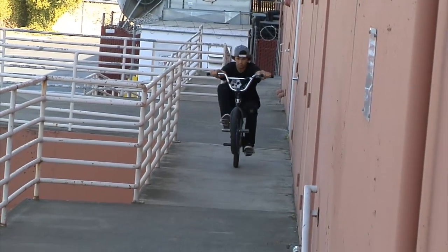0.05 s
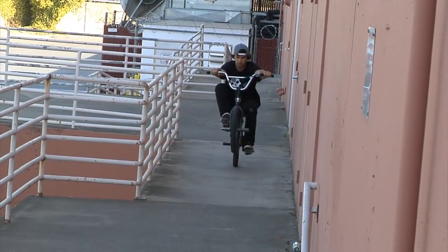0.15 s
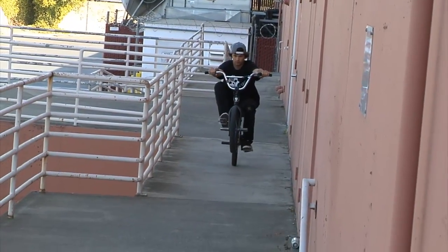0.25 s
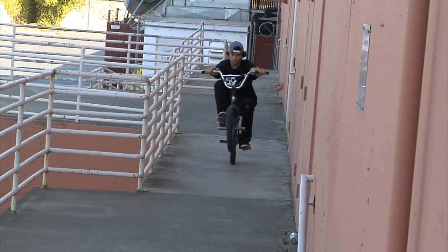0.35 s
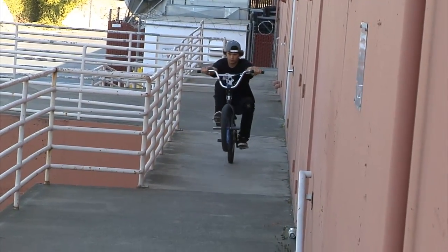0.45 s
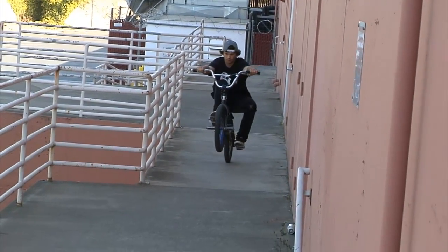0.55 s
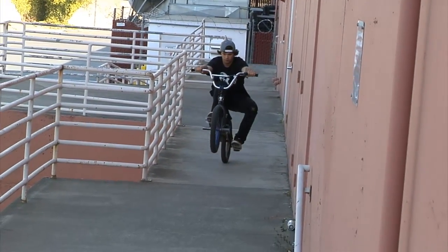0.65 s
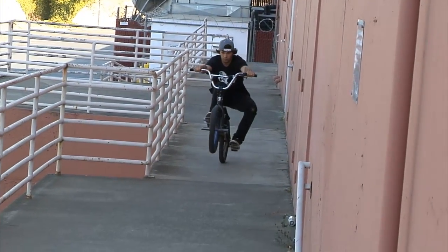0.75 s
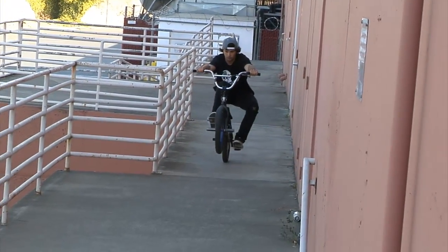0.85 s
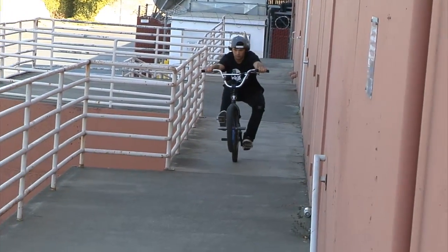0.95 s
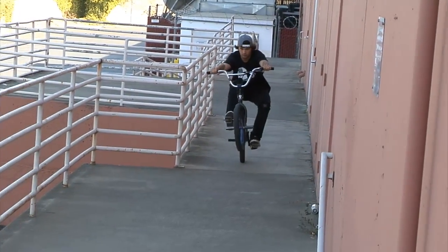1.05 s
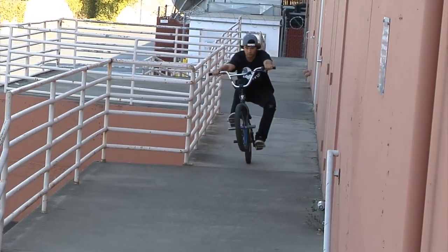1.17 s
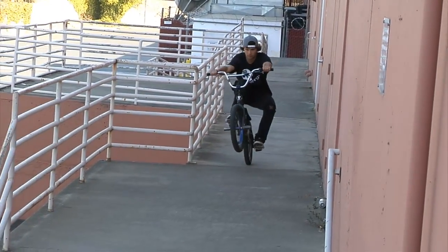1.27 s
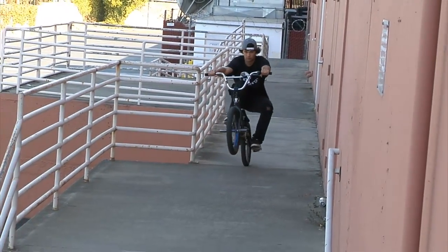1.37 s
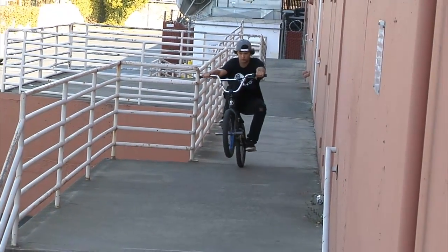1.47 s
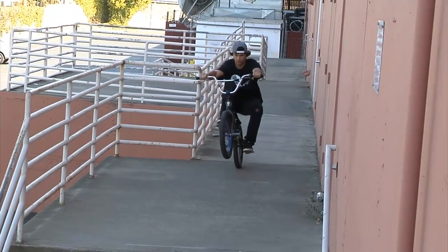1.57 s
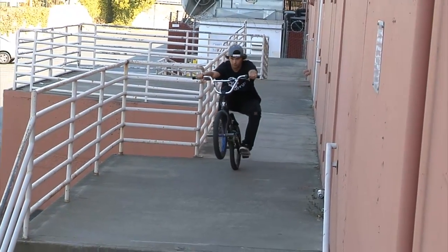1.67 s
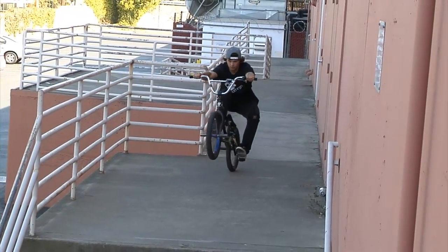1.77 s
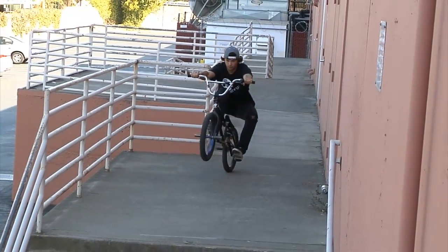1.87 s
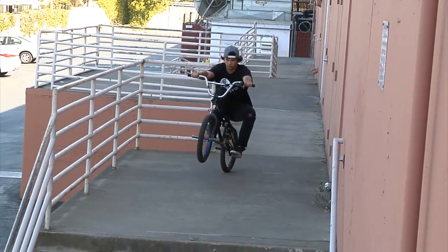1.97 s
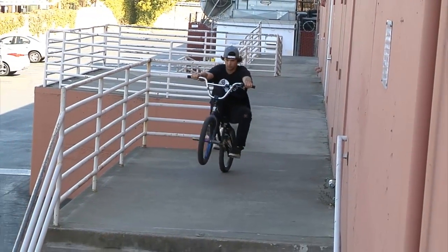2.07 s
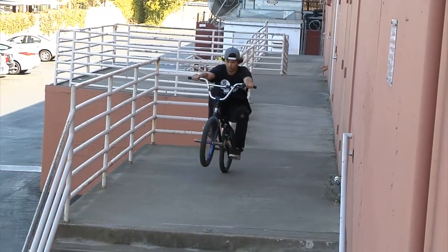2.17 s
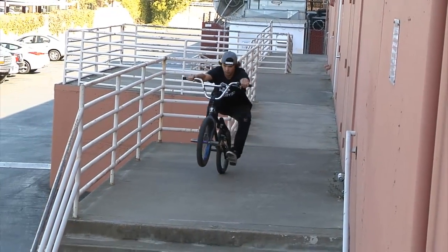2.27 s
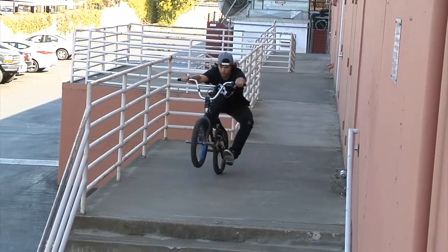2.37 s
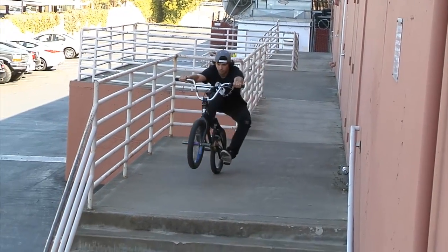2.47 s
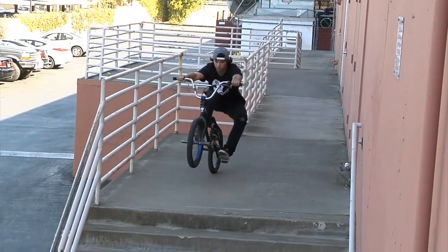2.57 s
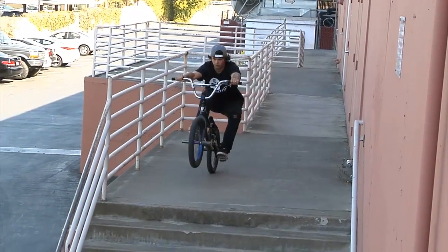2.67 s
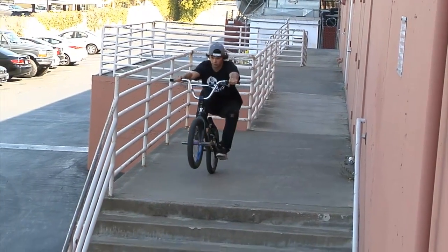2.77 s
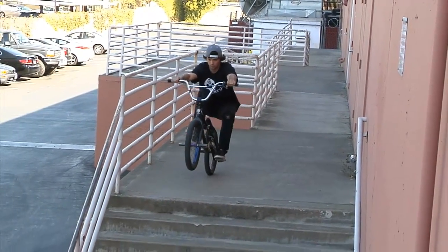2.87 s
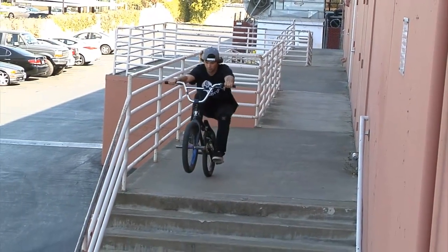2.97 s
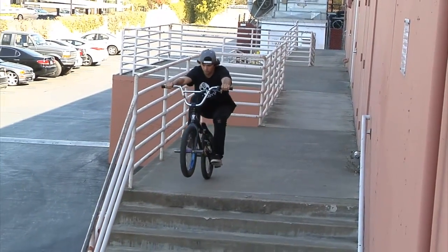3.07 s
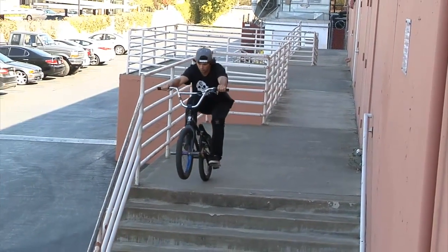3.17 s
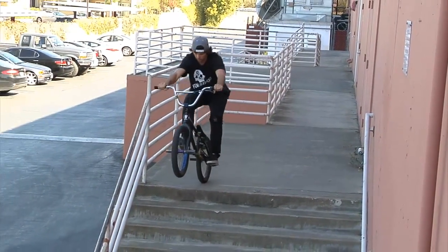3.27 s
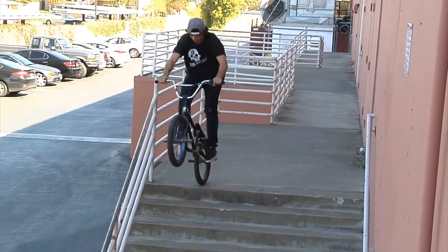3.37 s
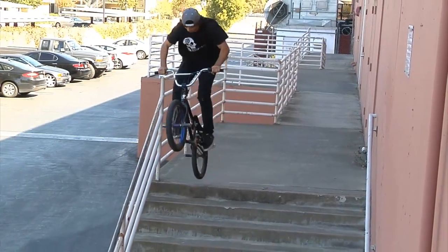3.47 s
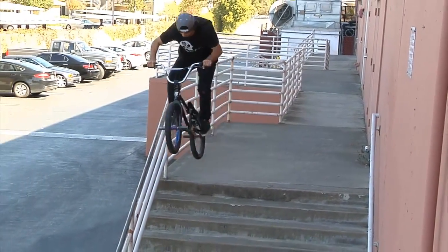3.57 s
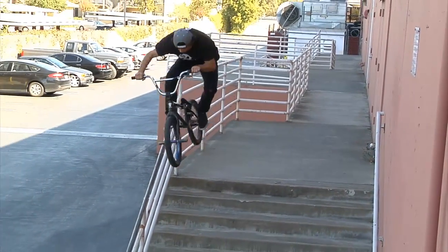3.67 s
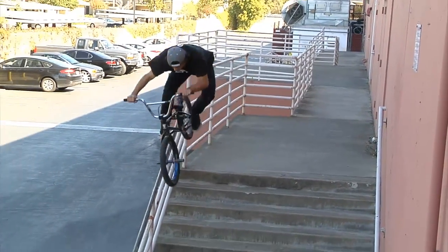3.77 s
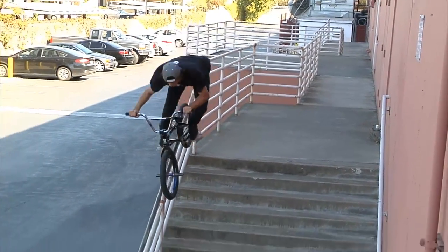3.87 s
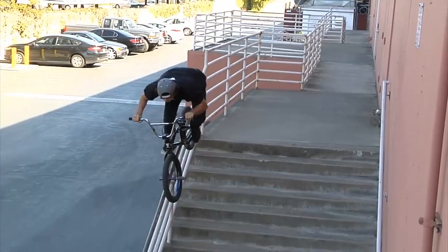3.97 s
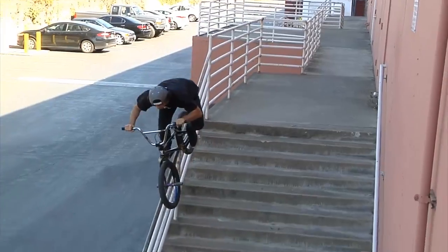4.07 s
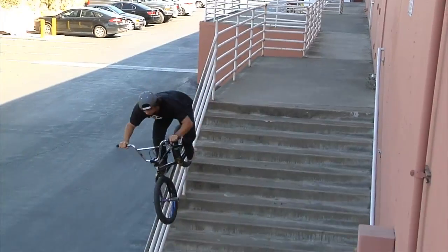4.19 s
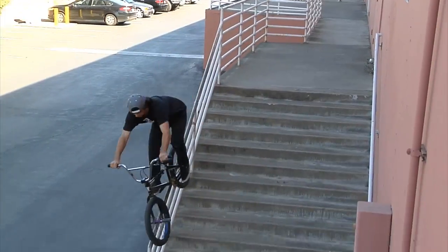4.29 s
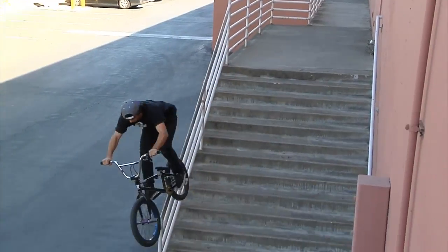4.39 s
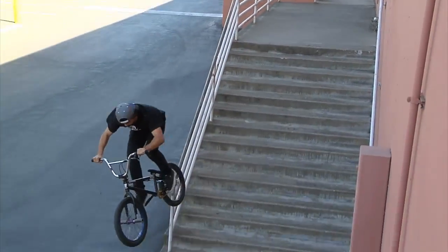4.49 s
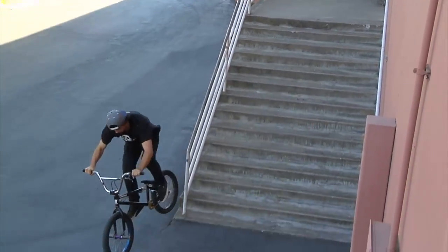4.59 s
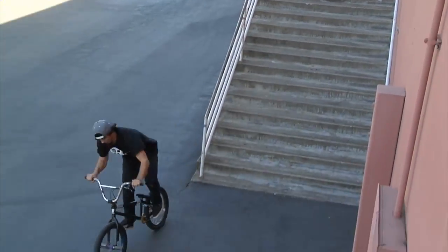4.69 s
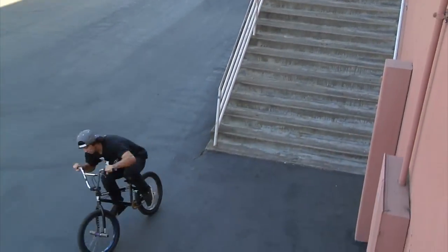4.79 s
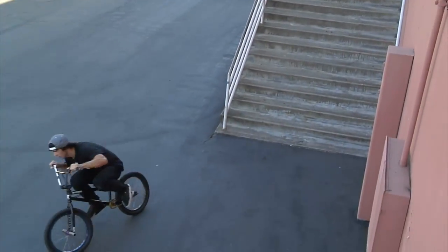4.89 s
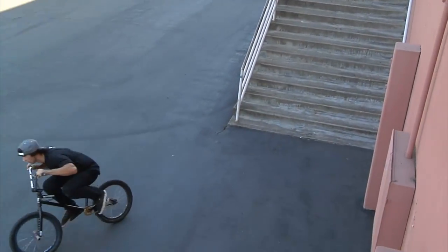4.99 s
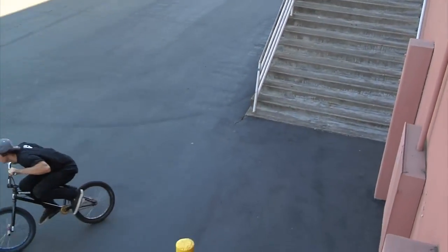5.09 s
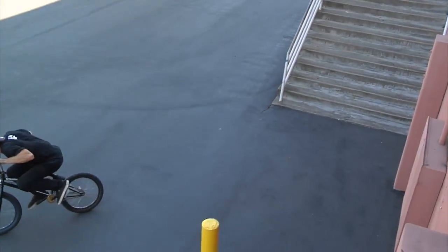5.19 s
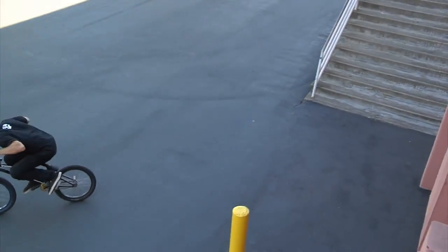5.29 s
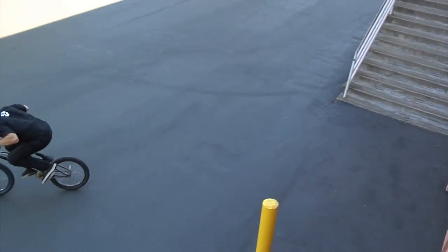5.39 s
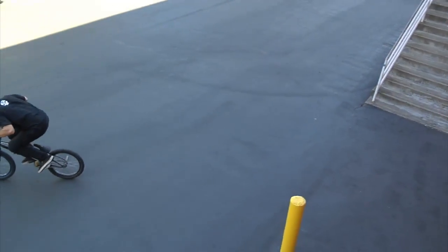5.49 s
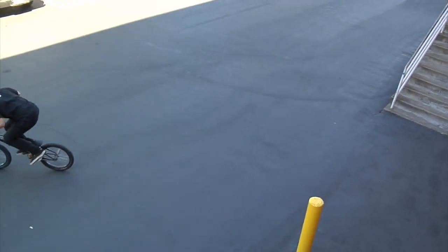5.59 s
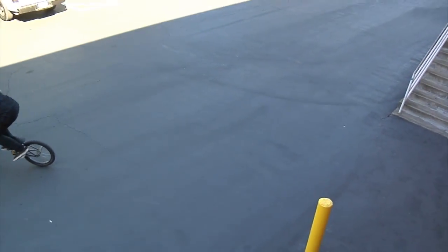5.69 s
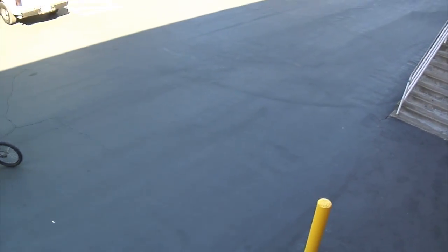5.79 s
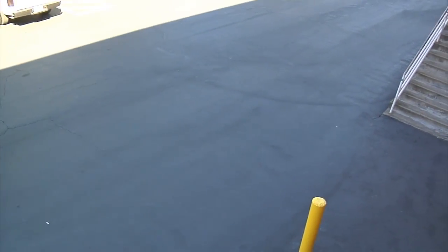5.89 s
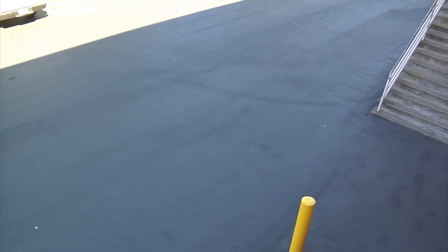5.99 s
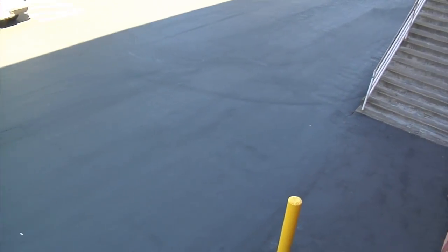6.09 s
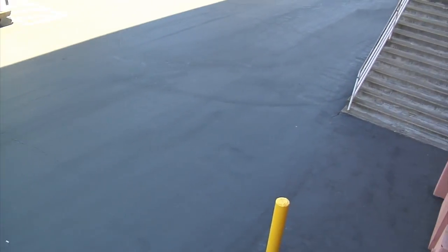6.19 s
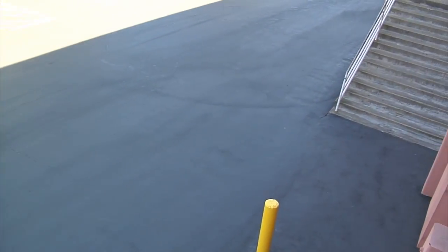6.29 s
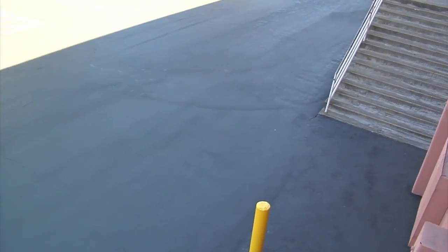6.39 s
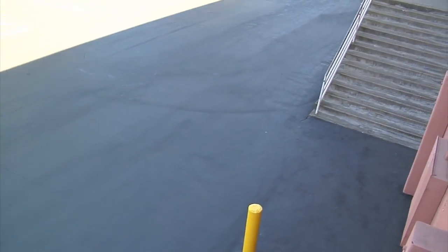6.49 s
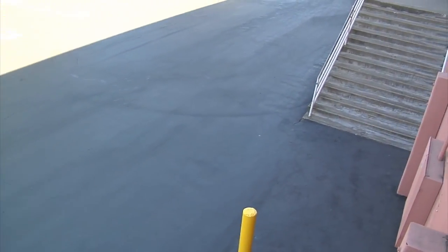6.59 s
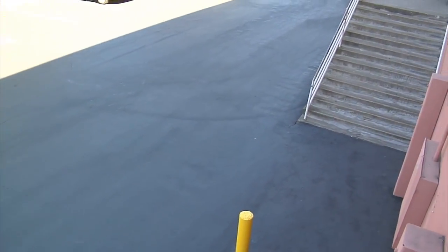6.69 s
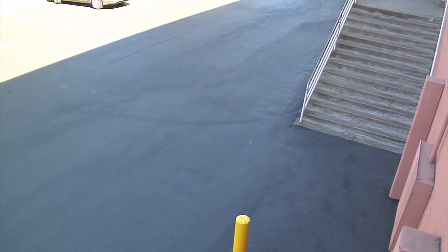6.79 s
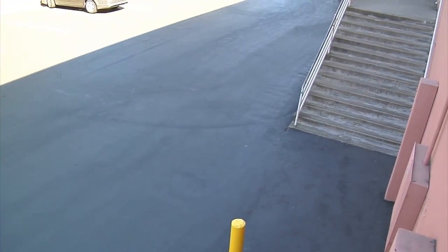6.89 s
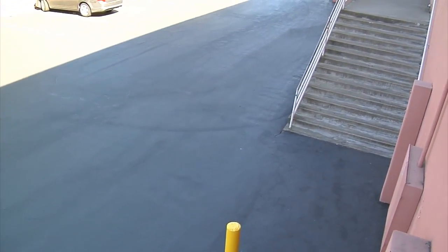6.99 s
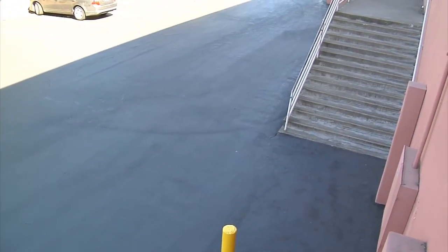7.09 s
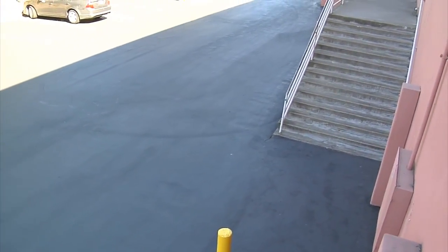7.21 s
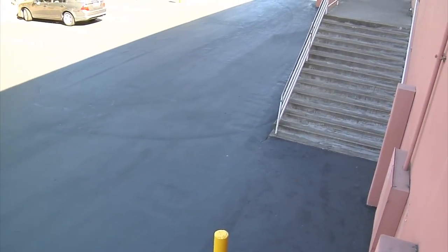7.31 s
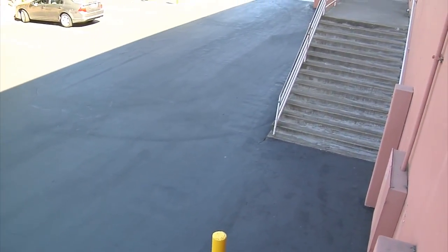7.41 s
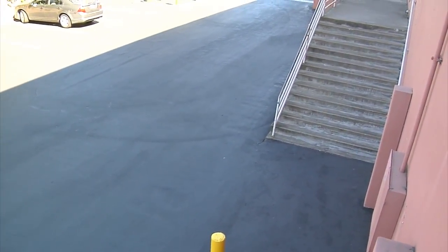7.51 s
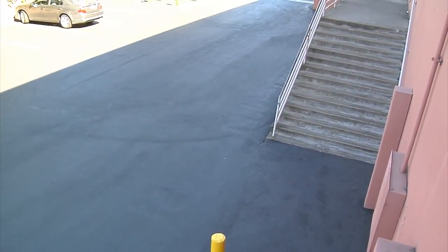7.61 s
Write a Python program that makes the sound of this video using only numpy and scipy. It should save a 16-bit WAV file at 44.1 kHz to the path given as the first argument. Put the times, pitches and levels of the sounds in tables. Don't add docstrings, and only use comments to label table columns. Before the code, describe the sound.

A coasting bike ticks faintly closer, cracks onto a steel handrail, scrapes down it, thumps onto asphalt with chain rattle, and buzzes off.

```python
import sys
import numpy as np
from scipy import signal
from scipy.fft import rfft, irfft
from scipy.io import wavfile
from scipy.ndimage import uniform_filter1d

SR = 44100
rng = np.random.default_rng(int(sys.argv[2]) if len(sys.argv) > 2 else 0)


def pcm_store(signal):
    levels = np.round(np.clip(np.atleast_2d(signal), -1, 1) * 32767)
    wavfile.write(sys.argv[1], SR, levels.astype(np.int16).T)


def ratio(d):
    e = np.asarray(d, float) / 20
    return 10 ** e


N = 337365
GRIND_STARTS_S, GRIND_ENDS_S, LANDS_S = 3.9205, 4.73, 4.745


def unit(x):
    return x / np.sqrt(np.mean(x ** 2))


def curve(table):
    s, *columns = np.transpose(table)
    return [np.interp(np.arange(N) / SR, s, c) for c in columns]


def step(s, takes):
    return .5 + .5 * np.tanh((np.arange(N) / SR - s) / takes)


def since(s):
    return np.maximum(np.arange(N) / SR - s, 0)


def decay(u, t60):
    return np.exp(-np.log(1000) * u / t60)


def add(out, s, sound):
    i = int(s * SR)
    out[i:i + len(sound)] += sound


def walk(rate):
    k = int(SR / rate)
    held = np.repeat(rng.standard_normal(N // k + 1), k)
    return uniform_filter1d(uniform_filter1d(held, k), k)[:N]


def band(x, lo_hz, hi_hz):
    return signal.sosfilt(signal.butter(4, [lo_hz, min(hi_hz, .45 * SR)], "band", fs=SR, output="sos"), x)


def ring(x, hz, width):
    r = np.exp(-np.pi * width / SR)
    gain = np.sqrt(1 - r * r)
    return signal.lfilter([gain, 0, -gain], [1, -2 * r * np.cos(2 * np.pi * hz / SR), r * r], x)


def colour(x, spectrum):
    hz, db = np.transpose(spectrum)
    bins_hz = np.arange(2049) * SR / 4096
    c = irfft(np.interp(np.log(bins_hz + 1), np.log(hz), db) * np.log(10) / 20)
    c[1:2048] *= 2
    c[2049:] = 0
    return signal.fftconvolve(x, irfft(np.exp(rfft(c))))[:len(x)]


def grind(blows):
    # (time [s], scrape level [dB], slip [0-1])
    peg_slide = [
        (3.935, -26.5, 0.65),
        (4.05, -30, 0.61),
        (4.21, -31.5, 0.16),
        (4.31, -25.5, 0.43),
        (4.39, -26, 0.86),
        (4.47, -25.5, 0.8),
        (4.52, -31, 1),
        (4.575, -30.5, 0.68),
        (4.63, -38, 0.26),
    ]
    # (frequency [Hz], density [dB per Hz])
    scrape_tone = [(90, -7.5), (210, 2.5), (330, -10), (510, -3), (1100, -13.5), (1870, -5), (2010, -9.5),
                   (3300, -13), (4200, -22.5), (5700, -36.5), (6300, -25), (8500, -32), (11000, -60),
                   (15700, -60)]
    # (level [dB], ring time t60 [s])
    rail_modes = [(-35, 2.9), (-36, 5), (-41, 0.4), (-44, 0.28), (-35.5, 1.14), (-47, 1.3), (-44.5, 0.94),
                  (-50, 0.48), (-63, 0.5), (-61, 3.5), (-52, 3), (-47, 0.56), (-43, 0.64), (-50, 0.5),
                  (-43.5, 1.56), (-45, 0.83), (-50, 0.86), (-54, 0.75), (-51, 1.9), (-55, 1.9), (-41, 1.5),
                  (-42, 0.07), (-43, 0.51), (-49, 0.5), (-46, 0.44), (-53, .3), (-41, 0.13), (-44, 0.073),
                  (-58, .3), (-51, 0.08), (-62, .3), (-51, .25), (-55, .2)]
    rail_hz = [151, 213, 301, 334, 495, 530, 590, 654, 734, 791, 829, 885, 915, 960, 1001, 1229, 1409, 1450,
               1529, 1593, 1697, 1845, 1889, 2140, 2203, 2480, 3112, 3310, 6290, 7620, 2690, 3520, 6650]
    scrape_db, slip = curve(peg_slide)
    t = since(GRIND_STARTS_S)
    touch = step(GRIND_STARTS_S, 0.0006) - step(GRIND_ENDS_S, 0.014)
    scrape_db = scrape_db + 8 * np.exp(-t / 0.0089)
    rumble_db = -21 - 17 * t - 12 * np.exp(-t / 0.0098)
    hiss_db = scrape_db - 22.5 + 15 * slip
    sizzle_db = scrape_db - 33.5 + 6.5 * slip + 1.5 * walk(60)

    grains = unit(rng.standard_normal(N) * ratio(2.0 * rng.exponential(size=N)))
    grains = grains * ratio(1.4 * walk(45) + 1.1 * walk(200))
    rough = colour(grains, scrape_tone)
    edges_hz = [90, 700, 5900, 10500, 15800]
    levels = [rumble_db, scrape_db - 0.8, hiss_db, sizzle_db]
    direct = touch * sum(unit(band(rough, lo, hi)) * ratio(db) for lo, hi, db in zip(edges_hz, edges_hz[1:], levels))

    force = touch * grains * ratio(scrape_db) + ratio(-7.5) * blows
    split = 1 + .003 * rng.uniform(.4, 1, len(rail_modes))
    tube = 0
    for hz, (db, t60), d in zip(rail_hz, rail_modes, split):
        width = np.log(1000) / np.pi / t60
        pair = ring(force, hz / d, width) - 0.58 * ring(force, hz * d, 2.37 * width)
        choke_db = (.5 + .5 * touch) * 5.5 * walk(70)
        tube = tube + ratio(db - 12.5 + choke_db) * unit(pair)
    return direct + tube


def knocks():
    # (time [s], peak [dB], hardness as treble [dB], decay t60 [s])
    metal_hits = [(3.9157, -29, -30, 0.041), (3.9202, -7, -16, 0.013), (3.9257, -12, -13, 0.024),
                  (3.953, -27, 3, 0.22), (3.968, -21, -13, .05), (4.012, -22.5, -22, 0.057),
                  (4.032, -19.5, -16, .05), (4.112, -26, -14, 0.06), (4.269, -32, -6, 0.071),
                  (4.317, -26, -18, 0.05), (4.360, -41, -6, .04), (4.374, -23.5, -0.5, 0.07),
                  (4.433, -27, -4, .05), (4.459, -33, -4, .04), (4.499, -31, -10, 0.056),
                  (4.5601, -26, -4, 0.06), (4.566, -26, -8, 0.077), (4.7359, -14, -18, 0.027),
                  (4.7432, -11.5, -4, 0.027), (4.748, -24, -3, 0.14), (4.759, -24, -6, 0.04),
                  (4.773, -39, 7, 0.061), (4.792, -36, 9, 0.061), (4.838, -29, -4, 0.059),
                  (4.872, -31, 1, 0.045), (4.93, -52, 4, .05), (4.944, -50, 6, .04)]
    # (frequency [Hz], width [Hz], level [dB])
    frame_modes = [(466, 85, -3), (980, 72, -6), (1780, 210, -2), (3000, 200, -24), (3170, 110, -30),
                   (4450, 350, -17.5)]
    layers, u = np.zeros((3, N)), np.arange(8192) / SR
    rattle = rng.standard_normal((len(metal_hits), 8192))
    for (s, db, treble_db, t60), noise in zip(metal_hits, rattle):
        rise_s = 0.0005 if s < 4.765 else 0.001
        burst = noise * (1 - np.exp(-u / rise_s)) * decay(u, t60)
        top_db = -36 + treble_db + 13 * (s > GRIND_ENDS_S)
        for layer, share_db in zip(layers, (0, treble_db, top_db)):
            add(layer, s, ratio(db + share_db) * burst)
    force, treble, top = layers
    on_rail = force * (np.arange(N) < 4.7 * SR)
    frame = sum(ratio(db) * ring(on_rail, hz, w) for hz, w, db in frame_modes)
    bright = band(0.5 * ring(treble, 7000, 3200), 4500, 11000)
    bright = bright + band(ring(top, 13000, 7000), 10000, 16400)
    return on_rail, ratio(-6.5) * frame + band(force, 450, 3720) + ratio(-6.0) * bright


def pings():
    # (time [s], peak [dB], frequency [Hz], ring time t60 [s])
    small_parts = [(3.921, -18.5, 960, 0.23), (3.943, -18, 1870, .05), (3.965, -21, 620, .2),
                   (4.0, -14, 517.7, 0.26), (4.05, -23, 1434, 0.17), (4.08, -22, 568, .15),
                   (4.185, -18, 217, 0.18), (4.285, -20, 570, 0.11), (4.323, -24, 1820, 0.099),
                   (4.35, -29, 3130, 0.33), (4.43, -24, 1886, .25), (4.40, -53, 13800, .15),
                   (4.41, -50, 13500, .12), (4.455, -51, 14500, .06), (4.50, -54, 14900, .1),
                   (4.525, -55, 13500, .08), (4.562, -27, 2920, .08), (4.59, -42, 6230, 0.39),
                   (4.85, -62, 13300, .8)]
    out, u = np.zeros(N), np.arange(16384) / SR
    for (s, db, hz, t60), noise in zip(small_parts, rng.standard_normal((len(small_parts), 16384))):
        shiver = 0.65 * unit(ring(noise, hz, 30 + .03 * hz))
        rough = np.sin(2 * np.pi * hz * u) + shiver
        add(out, s, ratio(db) * rough * (1 - np.exp(-u / (0.087 * t60))) * decay(u, t60))
    tinkle = unit(band(rng.standard_normal(N) * ratio(4 * walk(120)), 9500, 16000))
    return out + tinkle * step(LANDS_S, .004) * ratio(-56 - 60 * since(LANDS_S) / 1.1)


def thuds():
    # (time [s], peak [dB], frequency [Hz], decay t60 [s])
    tyre_hits = [
        (4.737, -24, 152, .05),
        (4.7435, -9.5, 130, 0.045),
        (4.7507, -12, 150, .025),
        (4.7555, -12, 155, 0.04),
    ]
    out, u = np.zeros(N), np.arange(8192) / SR
    for s, db, hz, t60 in tyre_hits:
        add(out, s, -ratio(db) * np.sin(2 * np.pi * hz * u) * decay(u, t60))
    return out


def landing():
    # (time [s], level [dB rms])
    chain_slaps = [
        (4.747, -31),
        (4.83, -39),
    ]
    # (frequency [Hz], density [dB per Hz])
    chain_tone = [(180, -51), (300, -12), (454, -4), (501, -0.5), (710, -8.5), (1570, -15.5), (4040, -51),
                  (8100, -25.5), (15700, -80)]
    # (frequency [Hz], peak [dB], ring time t60 [s])
    frame_tubes = [(497, -41, 3.8), (583, -47, 1.5), (783, -52.5, 4.3), (838, -50, 5.4), (1001, -49, 4.5),
                   (1233, -47, 1), (1536, -51, 3.2), (1600, -46.5, 1.6), (1690, -49, 1.6)]
    # (time [s], level [dB rms])
    tyre_air = [(4.82, -43), (4.95, -38.5), (5.08, -33), (5.17, -46), (5.35, -36), (5.52, -37.5),
                (5.62, -52), (5.77, -42), (5.92, -49.5), (6.25, -43), (7.0, -46.5), (7.6, -46)]
    t, down = since(LANDS_S), step(LANDS_S + .12, .06)
    slaps = sum(ratio(db - 60 * since(s) / 0.66) * step(s, 0.0035) for s, db in chain_slaps)
    chain = unit(colour(rng.standard_normal(N) * ratio(3.5 * walk(90)), chain_tone))
    tubes = 0
    for hz, db, t60 in frame_tubes:
        tubes = tubes + ratio(db - 60 * t / t60 + 3.5 * walk(20)) * np.sin(2 * np.pi * hz * t)

    air_db = curve(tyre_air)[0] - 1.5 + 2.0 * walk(14)
    air = ratio(air_db) * np.sqrt(2) * np.sin(2 * np.pi * 150.1 * t + 2.5 * walk(9))
    near_db, far_db, fade_s = -38, -57.5, 1
    tread_db = far_db + (near_db - far_db) * np.exp(-t / fade_s) + 3.5 * walk(6)
    noise = rng.standard_normal(N)
    tread = unit(ring(noise, 280, 48) + ring(noise, 466, 165) + 0.083 * ring(noise, 1800, 880))
    return slaps * chain + tubes + down * (air + ratio(tread_db) * tread)


def pawls(rate, blur):
    turns = np.cumsum(rate * (1 + 0.037 * walk(30))) / SR
    size = ratio(3 * rng.standard_normal(N // 100))[turns.astype(int)]
    snaps = size * np.exp(-(turns % 1) / 0.063)
    return rng.standard_normal(N) * (blur + uniform_filter1d(snaps, size=24))


def wheel(clicks, resonances):
    return unit(sum(ratio(db + 3.7 * walk(24) + 0.56 * walk(4.3)) * ring(clicks, hz, w) for hz, w, db in resonances))


def hub():
    # (frequency [Hz], width [Hz], level [dB])
    side_modes = [(2400, 600, -9), (3380, 160, 1.5), (4750, 500, -9), (5650, 300, -10), (6500, 600, -5),
                  (7600, 800, -2), (9900, 1200, -8), (11800, 2500, -6)]
    # (frequency [Hz], width [Hz], level [dB])
    back_modes = [(2300, 400, -5), (2790, 260, -2), (3300, 300, -4), (4400, 900, -10), (5330, 350, -6),
                  (6400, 900, -7), (7250, 500, -4), (9000, 1200, -11), (11500, 2000, -11)]
    t, now = since(LANDS_S), since(0)
    spin_up_s, rise_s = .25, 0.28
    rate = 190 * (1 - .5 * np.exp(-t / spin_up_s)) - 18 * t
    nearest_s, nearest_m, speed_m_s = 5.15, 3.9, 3.76
    db = -52 - 20 * np.log10(np.hypot(1, speed_m_s * (now - nearest_s) / nearest_m))
    turned = np.clip(0.15 + (0.87 - 0.15) * step(5.98, 0.042), 0, 1)
    top_db = -7 + 10 * np.minimum(now - 5.3, 0) - 22 * step(6.25, .17)
    clicks = pawls(rate, .45)
    side = wheel(clicks, side_modes)
    back = band(wheel(clicks, back_modes), 1430, 14400)
    top = unit(band(ring(clicks, 14900, 2600) + .9 * ring(clicks, 12300, 2000), 10500, 16400))
    buzz = np.sqrt(1 - turned) * side + np.sqrt(turned) * back + ratio(top_db) * top
    return (1 - np.exp(-t / rise_s)) * ratio(db) * buzz


def approach():
    # (start [s], end [s], shell level [dB], spokes level [dB])
    coasting = [
        (1.25, 2.0, -89, -76),
        (2.1, 2.45, -71, -77),
        (2.497, 3.12, -85, -72),
        (3.533, 3.95, -76, -66.5),
    ]
    clicks = pawls(52 + 11 * since(0), 0.36)
    edge_s = 0.13
    shell = spoke = ratio(-80) * (1 - step(GRIND_STARTS_S, .02))
    for starts_s, ends_s, shell_db, spoke_db in coasting:
        on = step(starts_s, edge_s * min(ends_s - starts_s, 1)) - step(ends_s, edge_s)
        shell = shell + ratio(shell_db) * on
        spoke = spoke + ratio(spoke_db) * on
    spokes = ring(clicks, 7440, 1040) + 0.19 * ring(clicks, 9800, 700) + .3 * ring(clicks, 13000, 500)
    return shell * unit(ring(clicks, 4900, 600)) + spoke * unit(spokes)


def birds():
    # (time [s], peak [dB], pitch drop [Hz], stress on the end [dB])
    chips = [(.186, -63, 780, 8), (.441, -58, 900, 2), (.690, -61, 820, 3), (.943, -64, 800, 8),
             (1.20, -65, 870, 9), (1.453, -64, 1100, 6), (1.705, -67, 750, 10), (2.215, -57, 1030, 1),
             (2.490, -54, 1500, 1), (2.760, -61, 930, 1), (3.04, -61, 700, 3)]
    # (time [s], peak [dB], frequency [Hz], length [s])
    whistles = [
        (0.02, -68, 7250, 0.054),
        (0.088, -64, 7100, 0.056),
        (.85, -64, 7250, 0.082),
        (.94, -62, 6850, .06),
        (1.028, -66, 6950, .07),
    ]
    echoes = [(0, 4), (-.012, -14), (.015, -9), (.040, -8), (.066, -17)]
    out = np.zeros(N)
    for (s, db, drop_hz, late_db), slip in zip(chips, rng.random(len(chips))):
        length = 0.018 + .008 * drop_hz / 1e3
        u = np.arange(int(length * SR)) / (length * SR)
        hz = 3755 - drop_hz * u ** 2.8 - 350 * np.exp(-((u - .38) / .09) ** 2)
        breaks = np.abs(np.sin(np.pi * u * 2.6 + .3 * slip)) ** .7 * ratio(late_db * u)
        note = ratio(db) * np.sin(np.pi * u) ** 0.027 * breaks * np.sin(2 * np.pi * np.cumsum(hz) / SR)
        for lag, echo_db in echoes:
            add(out, s + lag, ratio(echo_db) * (note if lag == 0 else band(note, 2500, 5400)))
    thin = np.zeros(N)
    for s, db, hz, length in whistles:
        u = np.arange(int(length * SR)) / SR
        flutter = 3.1 * np.sin(2 * np.pi * 70 * u)
        add(thin, s, ratio(db - 1.5) * np.sin(np.pi * u / length) ** .5 * np.sin(2 * np.pi * hz * u + flutter))
    return out * ratio(4.4 * walk(250)) + thin * ratio(5.5 * walk(150))


def yard(x):
    u = np.arange(SR) / SR
    tail = band(rng.standard_normal(SR), 71, 7500) * decay(u, 0.75) * (u > .012)
    return signal.fftconvolve(x, tail / np.sqrt(np.sum(tail ** 2)))[:N]


def town():
    # (frequency [Hz], density [dB per Hz])
    traffic_tone = [(12, -16), (20, -15), (38, -6.5), (130, -1), (246, -4), (283, -10), (354, -11),
                    (385, -11.5), (508, -9.5), (817, -22), (965, -23), (1690, -30.5), (3580, -36),
                    (4350, -42), (15700, -50)]
    # (frequency [Hz], width [Hz], level [dB rms])
    fan_tones = [(46.7, 13, -52.5), (87.3, 0.96, -49), (128.73, 1.2, -49.5), (184, 25, -57),
                 (363.3, 0.82, -52.5), (500, 8, -59.5), (946, 17, -66)]
    traffic = unit(colour(rng.standard_normal(N), traffic_tone)) * ratio(-39.5)
    swell = ratio(0.4 * walk(1.644) + 0.8 * walk(9))
    fans = sum(ratio(db) * unit(ring(rng.standard_normal(N), hz, w)) for hz, w, db in fan_tones)
    return traffic * swell + fans


def scene():
    blows, frame = knocks()
    bike = grind(blows) + frame + thuds() + pings() + landing() + hub() + approach()
    far = birds()
    wash = yard(ratio(-12) * bike + ratio(-13) * far)
    return (bike + far + wash + town())[None]


def low_pass(x):
    return signal.sosfilt(signal.butter(12, 16640, fs=SR, output="sos"), x)


def record(dry):
    cut = signal.sosfilt(signal.ellip(10, .2, 60, 15800, fs=SR, output="sos"), dry)
    return low_pass(cut)


dry = scene()
out = record(dry)
pcm_store(out)
```